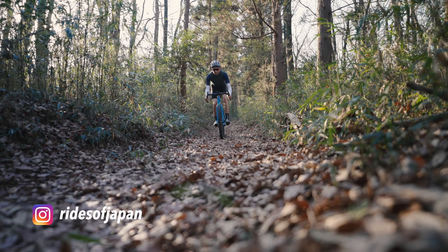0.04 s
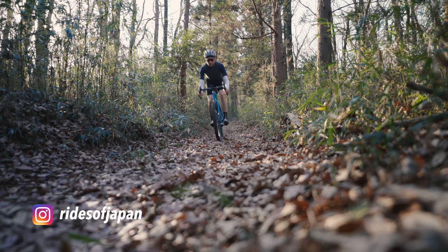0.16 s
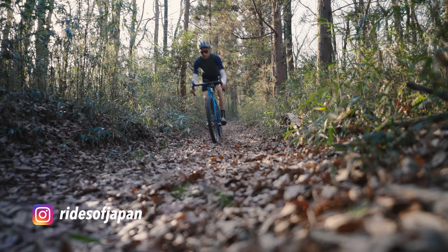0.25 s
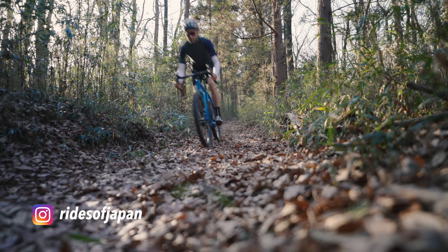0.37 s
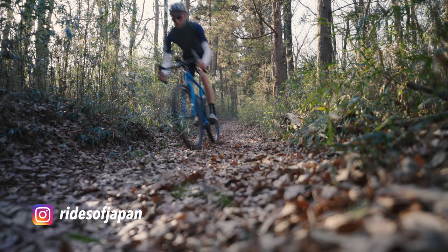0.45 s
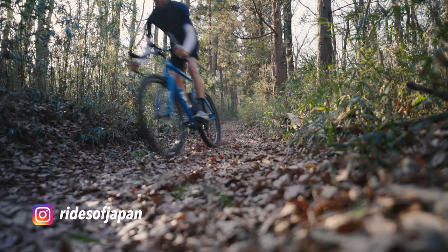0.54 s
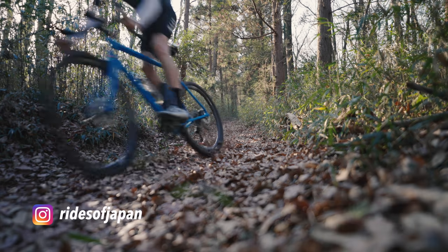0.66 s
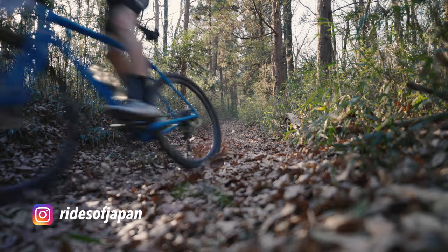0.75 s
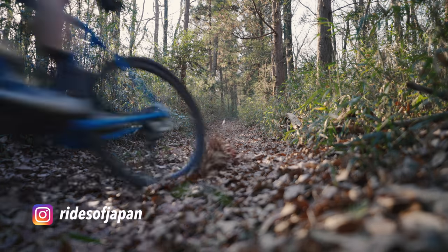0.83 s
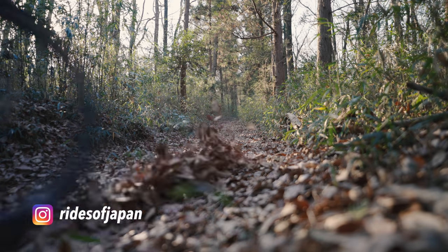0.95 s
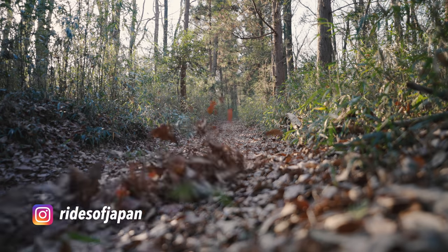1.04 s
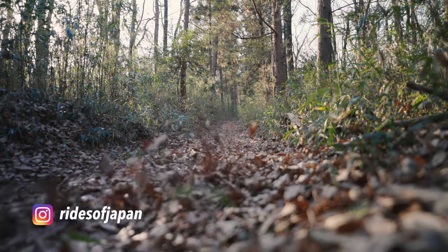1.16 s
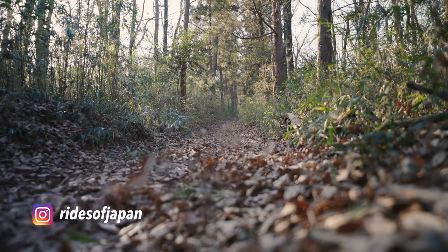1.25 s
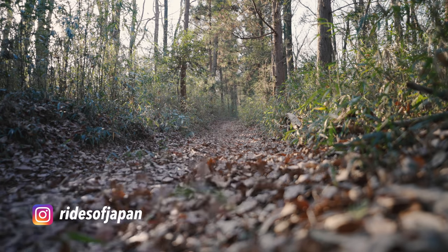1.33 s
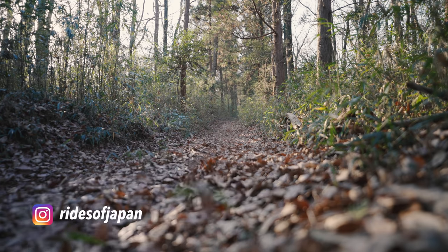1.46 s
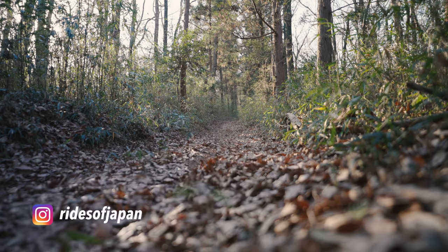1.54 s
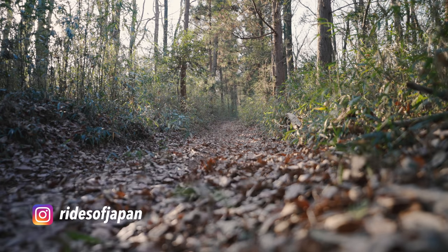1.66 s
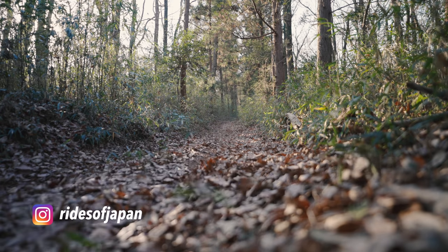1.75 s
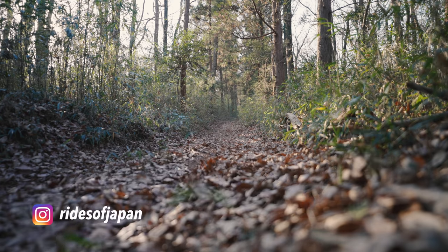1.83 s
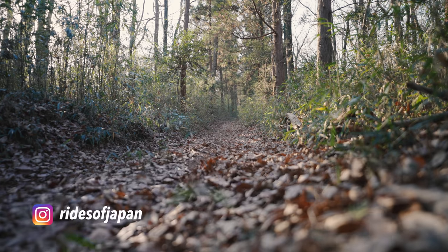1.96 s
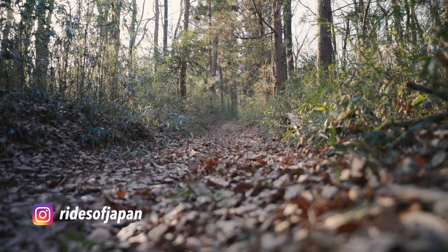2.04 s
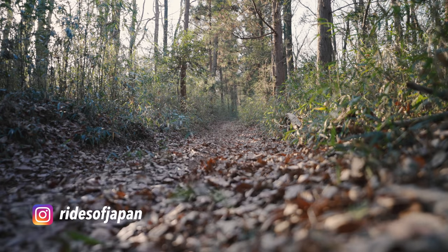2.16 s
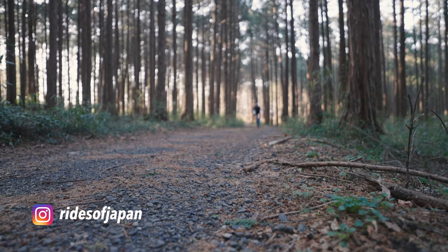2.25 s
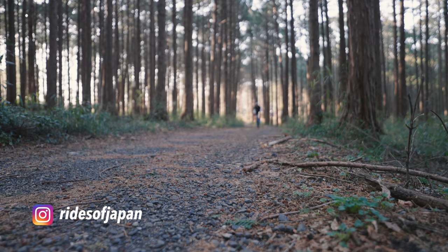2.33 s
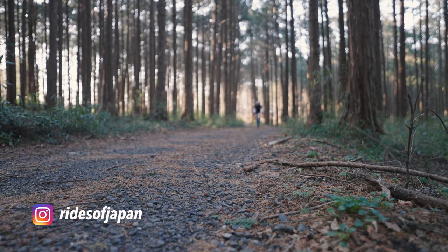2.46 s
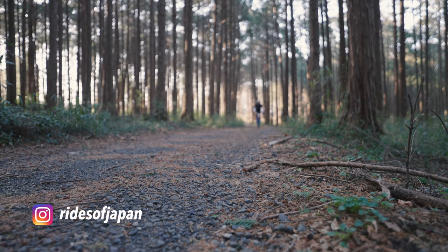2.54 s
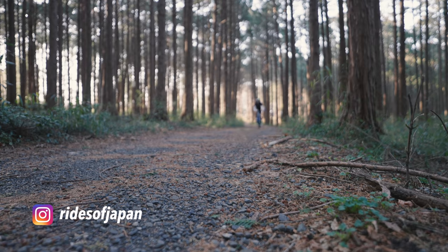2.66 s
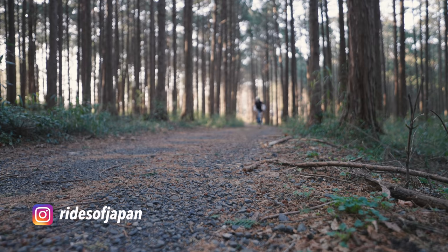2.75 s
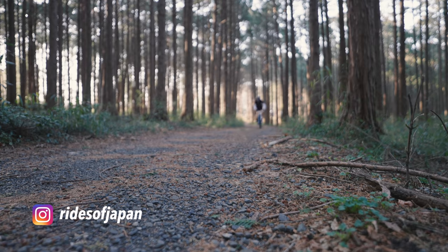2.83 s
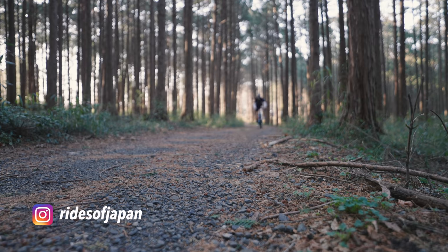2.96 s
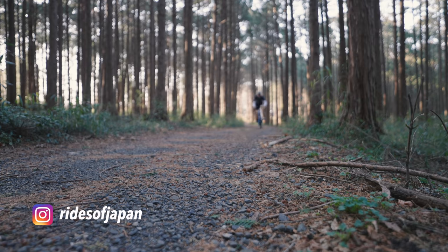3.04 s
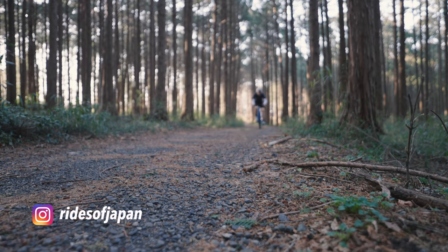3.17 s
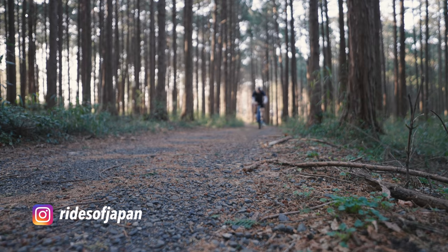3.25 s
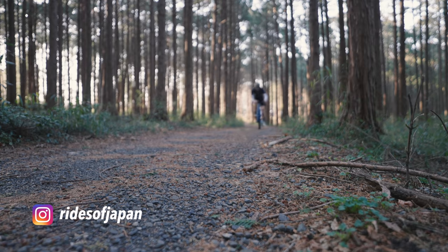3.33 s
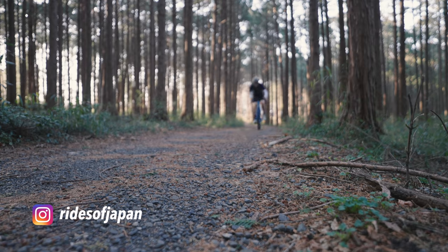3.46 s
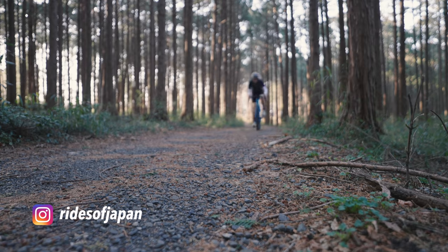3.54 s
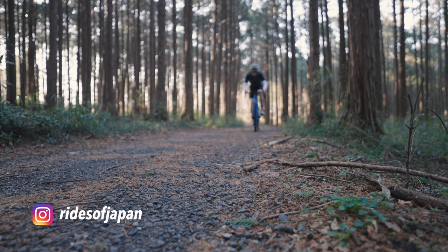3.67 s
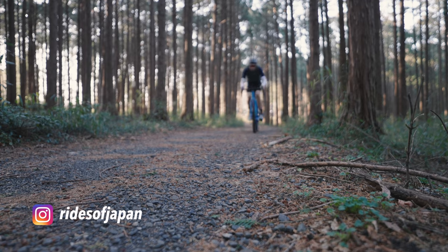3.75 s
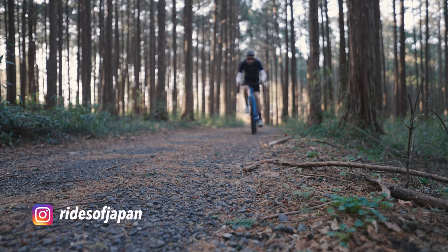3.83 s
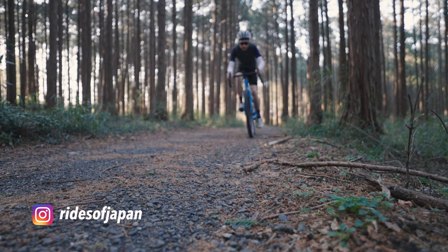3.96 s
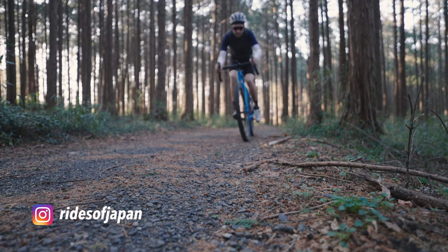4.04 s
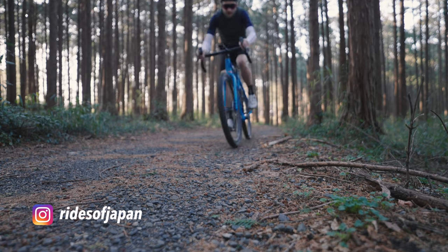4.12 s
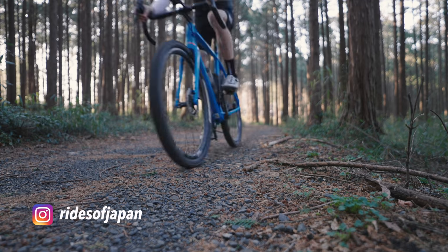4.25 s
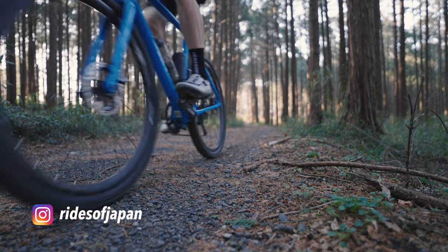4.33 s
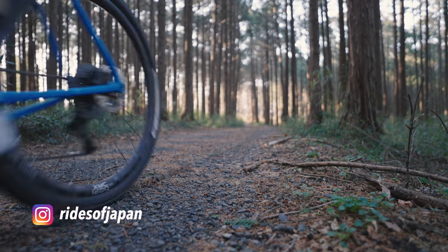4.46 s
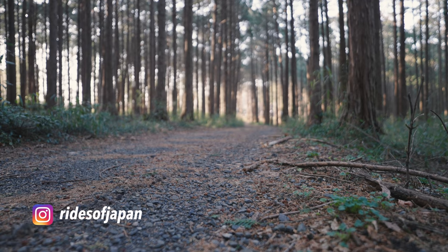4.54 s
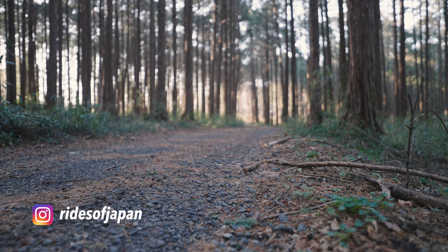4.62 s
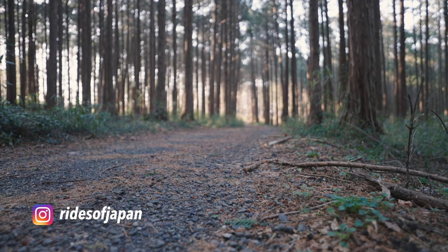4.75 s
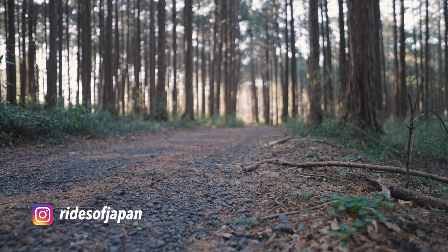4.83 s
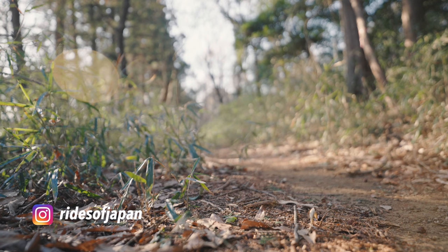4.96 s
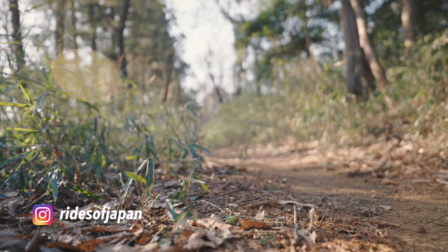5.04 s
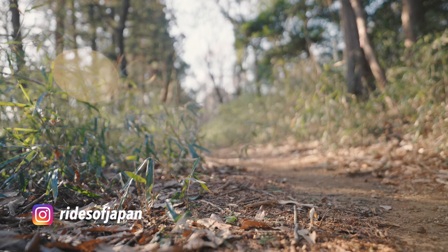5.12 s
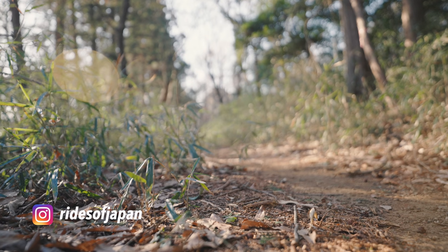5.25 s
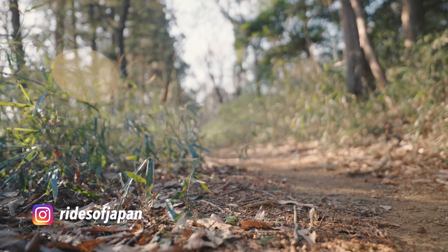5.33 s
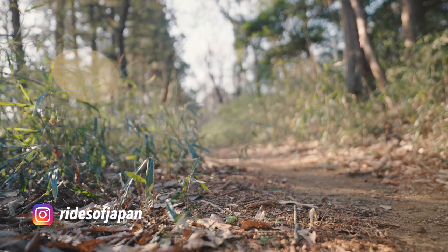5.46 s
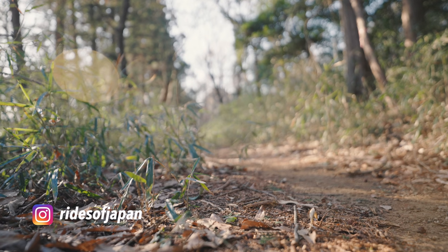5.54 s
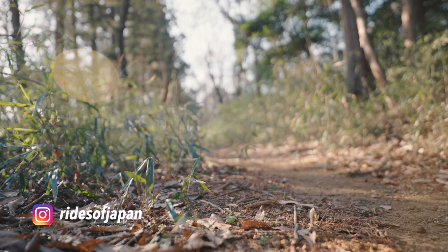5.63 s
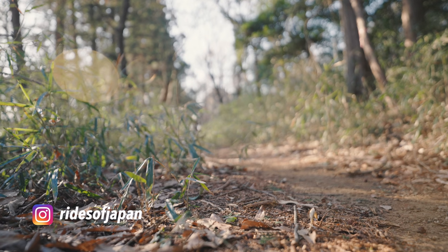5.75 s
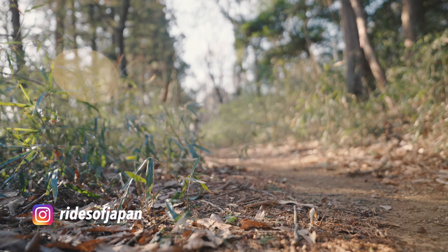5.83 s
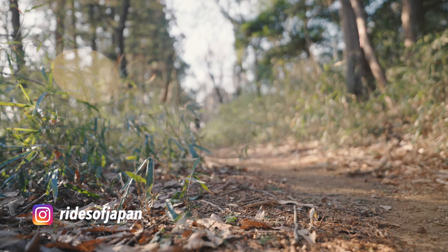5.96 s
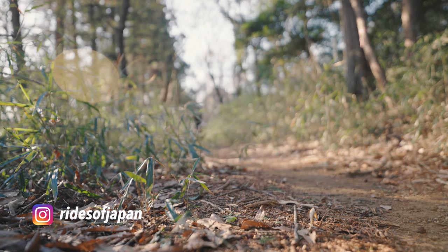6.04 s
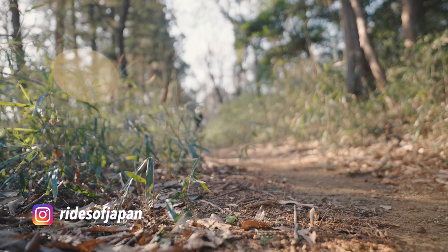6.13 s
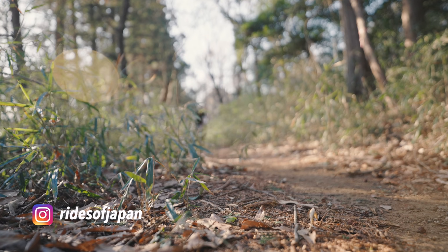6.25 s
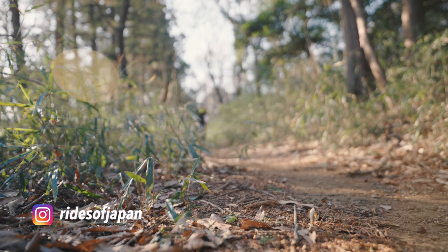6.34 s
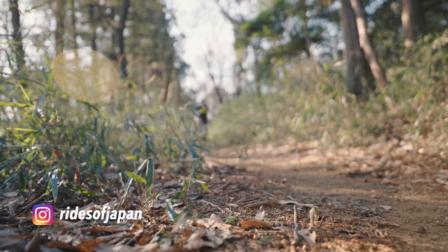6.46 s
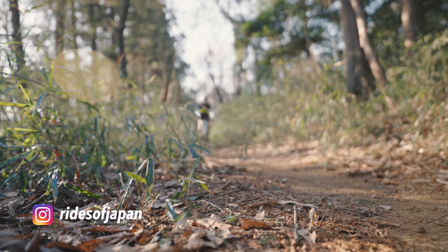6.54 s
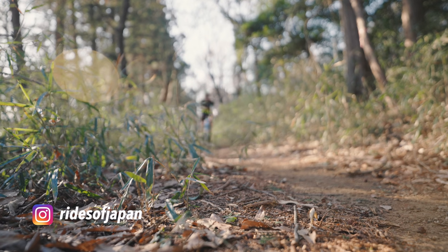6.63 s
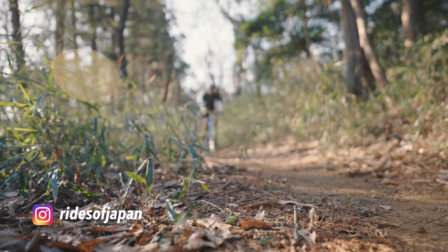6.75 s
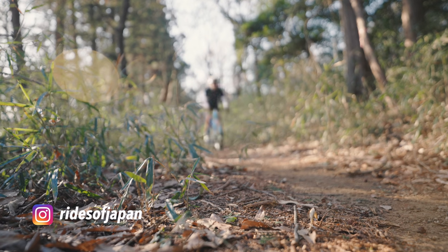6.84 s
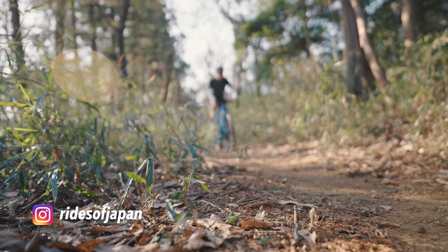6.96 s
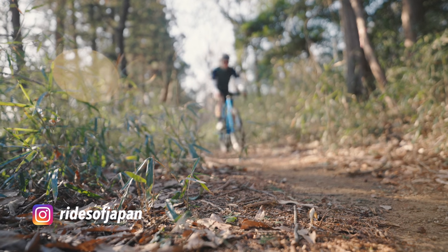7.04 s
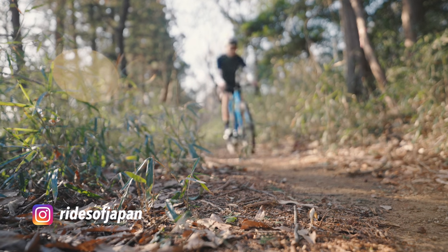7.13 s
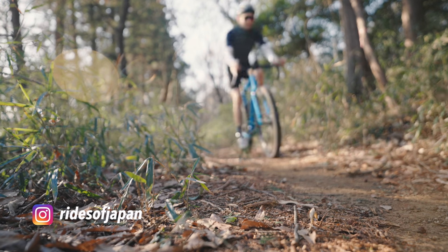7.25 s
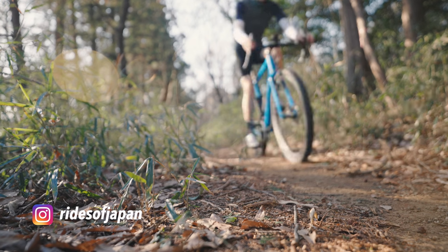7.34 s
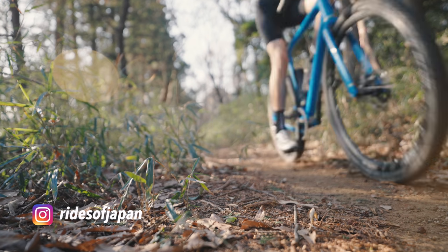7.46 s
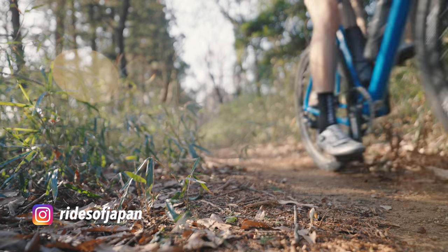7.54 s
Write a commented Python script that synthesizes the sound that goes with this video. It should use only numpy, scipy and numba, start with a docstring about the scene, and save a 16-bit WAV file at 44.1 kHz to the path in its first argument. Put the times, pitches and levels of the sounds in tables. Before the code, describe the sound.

A bicycle tyre rushes up over dry leaves, crunching loudest before one second, with a low thump of air, a brief freewheel buzz and leaves settling. A cut brings steady patchy gravel crunch that grows to sharp stone and twig snaps at about 4.5 seconds, then drops away. Last, near-quiet dirt with small ticks builds to a close crackling pass. Mono microphone on the forest floor, dry and close.

```python
"""A bicycle rolls past a microphone on the forest floor three times: over dry leaves, over gravel, over twigs
and dirt. The tyre is random grain clicks and hiss through resonances: rumbling carcass, humming air ring,
crunching stones. Twigs snap with a spike and a short ring, one with a forest echo; leaves are bright noise that
rustles, swishes, ticks. On the first pass the freewheel buzzes in even noise clicks. Stirred air buffets the
microphone with low noise; eddies and wheel thuds are pressure flips. A faint electronic whine hangs high up in
steady sines."""
import sys
import numpy as np
from scipy import signal
from scipy.io import wavfile
from scipy.ndimage import uniform_filter1d
from numba import njit

SR = 44100
rng = np.random.default_rng(int(sys.argv[2]) if len(sys.argv) > 2 else 0)


def dump_mix(stems):
    """Bounce the given channels to the path in sys.argv[1] as a 16-bit WAV at rate SR."""
    frames = np.atleast_2d(stems).T  # one column per channel
    limited = np.clip(frames, -1, 1)  # hard clip at full scale
    pcm = np.round(limited * 32767).astype(np.int16)
    wavfile.write(sys.argv[1], SR, pcm)


N = 334719

# the three grounds: [start t/s, patchiness 0-1]
GROUNDS = [(0, 0), (2.282, 0.95), (5, 0.7)]

# Resonances: [f/Hz, width/Hz of each of two filter stages, relative level/dB on each of the three grounds]
# tyre carcass
CARCASS_MODES = [(76.1, 54.3, 1, 9.5, 9.5), (102.5, 60, -5, -4, -18), (159, 145, -5, -2.5, -2)]
# air ring inside the tyre
AIR_RING_MODES = [(348, 52, -0.5, 1.5, 4), (692, 137, -6, -3, -3), (1050, 46, -7, -10.5, -14.5)]
# stones
GRAVEL_MODES = [(471, 425, 5.5, 0.016, 1.5), (756, 770, 1.5, 0, 1.4), (1128, 434, -5.5, 0.0036, -4.5),
                (1440, 550, -4.5, 0.0074, -3.5)]
# twig litter
LITTER_MODES = [(1890, 670, -6.5, 4.5, -3.5), (2650, 930, -6, 1, -6), (3480, 1900, -0.5, 0, -5.5),
                (4740, 2340, -4.5, -7.5, -9.5)]
# dry leaves
LEAF_MODES = [(6460, 7300, -1.5, -1.5, 0.17), (7500, 5400, -0.87, -2.5, -1.3),
              (11540, 7900, 0.98, -1.7, -1.3), (14400, 7800, 0.31, 0, -0.48)]
# stirred air at the microphone
BUFFET_MODES = [(34, 13, 1.2, 7, 0.54), (67, 32, 2.7, -8, 0)]

# the passes, the second with its fading apart:
# [t/s, crunch under the tread level/dB, twig litter level/dB, leaf rustle level/dB]
ROLLS = [
    [(0.0, -46.5, -49.5, -51.5), (0.21, -47.5, -47.5, -44), (0.37, -44.5, -41, -40),
     (0.45, -37, -34, -34.5), (0.65, -33, -25.5, -29), (0.77, -29.5, -30.5, -27), (0.87, -25.5, -30, -28),
     (0.92, -33, -30, -30.5), (1.0, -44, -39, -39.5), (1.08, -51, -43, -41), (1.2, -49.5, -43, -39),
     (1.32, -50.5, -40.5, -39.5), (1.44, -42, -44, -41.5), (1.61, -50, -51, -48.5), (1.87, -54.5, -50, -50),
     (2.0, -61, -60, -56.5), (2.275, -57.5, -58, -61)],
    [(2.29, -45.5, -66, -61), (2.47, -44.5, -66, -65), (2.72, -42, -58.5, -56.5), (2.84, -44.5, -63, -63.5),
     (3.3, -38.5, -58.5, -60.5), (3.38, -38, -57.5, -57.5), (3.64, -39, -55, -61), (3.96, -35, -47.5, -58),
     (4.06, -32, -44.5, -55), (4.26, -30, -39.5, -45.5), (4.37, -28.5, -33, -40.5), (4.45, -33, -40.5, -48),
     (4.52, -29.5, -36, -47)],
    [(4.54, -38.5, -45.5, -56), (4.62, -43, -54, -59), (4.68, -53, -57, -66), (4.77, -46, -61, -68),
     (4.85, -52.5, -64.5, -70), (4.995, -54.5, -67.5, -71)],
    [(5.0, -60, -65, -73), (5.12, -61, -69.5, -76), (5.22, -62.5, -60.5, -65.5), (5.6, -51, -55, -64.5),
     (5.78, -57, -60.5, -58.5), (6.05, -55.5, -58.5, -59), (6.35, -49, -50, -60), (6.65, -43.5, -47, -52),
     (6.72, -50, -54, -59.5), (6.85, -46.5, -53, -57), (7.05, -43, -47, -50.5), (7.22, -36.5, -45, -50.5),
     (7.33, -44, -42.5, -52.5), (7.4, -38, -39, -44.5), (7.51, -31.5, -35, -36.5),
     (7.59, -38.5, -33.5, -42)],
]
# shaking of the tyre carcass: [t/s, level/dB]
RUMBLE = [(0.0, -29.5), (0.06, -43), (0.65, -36.5), (0.89, -20.5), (1.2, -43), (1.65, -48.5), (1.88, -40),
          (1.92, -54), (2.07, -50), (2.26, -49), (2.3, -37.5), (2.49, -43), (3.87, -42.5), (4.4, -33.5),
          (4.69, -49), (4.99, -37.5), (5.03, -53.5), (6.47, -50.5), (7.06, -39.5), (7.31, -49.5),
          (7.46, -32), (7.59, -40)]
# air stirred at the microphone: [t/s, level/dB]
WAKE = [(0.0, -63), (0.74, -68), (0.89, -27), (1.01, -49), (1.41, -52), (1.86, -41), (2.26, -43),
        (2.33, -60), (4.25, -69), (4.37, -40), (4.46, -66.5), (5.94, -69), (7.57, -58), (7.59, -54)]
# bumps that set the air ring humming for a moment: [t/s, level/dB]
BUMPS = [(0.505, -33), (0.655, -35), (0.86, -28), (2.718, -37), (2.921, -44), (3.335, -32.5),
         (3.537, -33.5), (3.96, -53), (4.29, -26), (5.21, -47.5), (5.29, -52), (5.42, -55), (5.88, -56),
         (6.239, -50), (6.435, -50), (6.655, -49), (7.395, -42), (7.509, -40)]
# air ring above the crunch: [level/dB on each of the three grounds]
AIR_RING_DB = [-3.5, -3, -4.5]
# lone chips above the crunch: [level/dB on each of the three grounds]
CHIPS_DB = [-11, -14.5, -12.5]
# steady tones of the electronics: [f/Hz, rms level/dB]
WHINE = [(6751, -81), (7127, -80), (13501, -85), (14250, -83), (14626, -84)]

# stones and twigs under the tread: [t/s, level/dB, f/Hz, spike relative level/dB, crunch relative level/dB]
SNAPS = [(0.047, -29, 400, -4, -10), (0.162, -28, 730, -8, -8), (0.334, -28, 750, -7, -5),
         (0.504, -16.5, 342, -8, -12), (0.595, -13, 2000, -11, -12), (0.652, -11.5, 369, -7, -6.5),
         (0.722, -17, 1210, -4, 0), (0.772, -12, 676, -7, -0.5), (0.863, -18, 493, -20, -10),
         (1.352, -12.5, 1090, -16, -11), (1.389, -16, 1070, -22, -13), (1.443, -18, 800, -20, -10.5),
         (1.56, -26.5, 636, -10, -12), (2.382, -25, 690, -15, -10), (2.49, -21.5, 790, -28, -30),
         (2.598, -20.5, 780, -24, -9), (2.635, -24.5, 690, -19, -6), (2.685, -29, 370, -18, -21),
         (2.72, -26.5, 500, -14, -12), (2.787, -25, 466, -23, -30), (2.869, -26, 750, -8, -13),
         (2.937, -23.5, 735, -7, -16), (2.911, -19, 395, -24, -29), (2.993, -22, 483, -2, -12),
         (3.029, -27.5, 730, -8, -19), (3.163, -37, 705, -8, -15), (3.211, -18, 480, -17, -29),
         (3.335, -20.5, 480, 0, -8), (3.363, -20, 780, -15, -17), (3.389, -15, 720, -3, -19),
         (3.447, -23, 900, -8, -11), (3.49, -26, 1070, -15, -9), (3.539, -24, 368, -17, -19),
         (3.585, -25, 1280, -11, -8), (3.609, -33, 2000, -6, -9), (3.643, -23.5, 1060, 1, -5),
         (3.708, -22, 895, -10, -14), (3.737, -18.5, 990, -4.5, -15), (3.783, -32.5, 350, 7, 1),
         (3.81, -27, 2450, -9, -12), (3.83, -29, 2500, -5, -10), (3.877, -19, 1130, 2, -1.5),
         (3.954, -24, 708, -11, -17), (4.016, -27, 366, -2, 10), (4.033, -16.5, 696, -17, 0.5),
         (4.094, -22.5, 1300, 1, -1), (4.133, -21, 681, 4, -13), (4.155, -18, 730, -4, 1),
         (4.192, -24, 710, -2, -9), (4.22, -18, 1500, -3, -7), (4.261, -16, 680, -6, 5),
         (4.287, -15.5, 363, -6, -2), (4.307, -14, 650, -8, -12), (4.328, -19, 675, -3, 5.5),
         (4.355, -17, 1463, -6, -2), (4.384, -15, 660, 5, 8.5), (4.457, -16.5, 563, -10, -4),
         (4.481, -15.5, 560, -13, -1), (4.491, -16, 2200, -8, 0), (4.508, -11, 2340, -20, -6),
         (4.5153, -5, 2350, -0.5, -5), (4.593, -27, 2920, -15, -14), (4.706, -24, 2170, -18, -15),
         (5.543, -22, 3930, -14, -11.5), (5.599, -25, 373, 2.5, -7.5), (5.614, -28, 600, -4, -8),
         (6.071, -29, 407, -3, -14), (6.213, -27, 410, -4, -9.5), (6.349, -28, 700, 6, 0),
         (6.427, -29.5, 620, -2, -13), (6.505, -31, 1020, -10, -3), (6.53, -27, 900, -6, -7),
         (6.7, -31, 2000, -10, -14), (6.454, -29, 1200, -10, -20), (6.868, -36, 890, -5, -11),
         (6.937, -31, 890, -7, -8), (7.025, -27, 700, -4, -3.5), (7.048, -25.5, 796, -6, -4),
         (7.066, -22, 1390, -5, -17), (6.616, -38, 368, 15, 10.5), (6.65, -22, 463, -3, -10.5),
         (7.095, -26.5, 1220, 9.5, -8), (7.137, -21.5, 1500, -10, -12), (7.171, -15, 1440, -12, -14),
         (7.1974, -13, 670, 4, -9), (7.261, -30, 1300, 0, 2), (7.304, -26, 1290, -14, -15),
         (7.389, -13, 414, -8, 0), (7.4, -19, 726, 8, 2), (7.525, -9.5, 790, -3, -3)]
# time scale of a snap's crunch: [time/ms on each of the three grounds]
CRUNCH_MS = [10.3, 3.5, 10.5]
# leaves ploughed, thrown up, settling or stirred; at 5.56 s the forest echo of a snap:
# [peak t/s, f/Hz, width/Hz, level/dB, rise/(dB/s), fall/(dB/s)]
SWISHES = [(0.62, 1960, 700, -29.5, 51, 51), (0.8, 660, 350, -29, 300, 76), (0.96, 3320, 1000, -36, 66, 83),
           (1.27, 1090, 600, -44, 300, 64), (1.355, 1180, 700, -35, 250, 135),
           (1.7, 1110, 250, -55.5, 34, 30), (1.8, 490, 200, -56.5, 23, 31),
           (1.9, 3630, 2020, -60.5, 30, 1.5), (1.95, 7100, 3000, -62.5, 30, 13),
           (5.56, 3100, 1880, -48, 600, 79)]
# brittle leaves breaking: [t/s, level/dB, f/Hz]
TICKS = [(1.531, -28, 8400), (1.665, -26, 3400), (1.83, -28, 4000), (1.88, -38, 3000), (1.911, -32, 6530),
         (1.958, -42, 6400), (2.174, -47, 6400), (2.212, -35.5, 5000), (2.32, -42, 6000),
         (2.578, -30, 7710), (2.599, -22.5, 12500), (3.136, -33, 7300), (3.3317, -30, 6700),
         (3.39, -26.5, 8300), (3.53, -33, 5900), (3.687, -41, 4500), (4.0, -41, 6000), (4.016, -42, 5000),
         (4.155, -29, 12200), (4.258, -35, 5560), (4.384, -23, 8000), (4.466, -21, 14100),
         (4.481, -21, 12000), (4.4898, -17, 10000), (5.2103, -41.5, 6260), (5.35, -44, 5000),
         (5.48, -42, 5000), (5.822, -32, 6540), (5.881, -34, 11000), (6.9373, -31, 8040),
         (7.0224, -35, 6400), (7.193, -28, 5720), (7.234, -32, 6300), (7.322, -29, 13700),
         (7.386, -20, 5590), (7.525, -14, 5240)]
# low pressure jumps, eddies of the wake and from 7.45 s on thuds of the passing wheel:
# [t/s, level/dB, +1 pressure jumps up or -1 down]
PRESSURE_JUMPS = [(1.765, -34, -1), (1.823, -31, 1), (1.88, -28.5, -1), (2.01, -29, -1), (2.069, -28, -1),
                  (2.103, -31, 1), (2.13, -27, -1), (2.187, -30, 1), (2.263, -33.5, 1), (7.452, -29, -1),
                  (7.466, -35, -1), (7.506, -35, -1)]


def undb(db):
    """Gain of a level in dB."""
    return 10 ** (np.asarray(db) / 20)


def unit(x):
    """Scale to rms 1."""
    return x / np.sqrt(np.mean(x ** 2))


def add(out, s, x):
    """Mix x into out from second s on."""
    i = int(s * SR)
    out[i:i + len(x)] += x[:N - i]


def ground(values):
    """The value that holds on the ground of the moment, sample by sample."""
    starts = [start for start, _ in GROUNDS]
    return np.asarray(values)[np.searchsorted(starts, np.arange(N) / SR, "right") - 1]


def follow(table):
    """The columns of a curve, one interpolated value for each sample."""
    s, *columns = np.transpose(table)
    return [np.interp(np.arange(N) / SR, s, column) for column in columns]


def swell(s, db, rise, fall):
    """Gain that climbs to db at second s and sinks again, with slopes in dB per second."""
    t = np.arange(N) / SR
    return undb(db - np.maximum(rise * (s - t), fall * (t - s)))


@njit
def svf(x, hz, width):
    """State-variable band-pass, gain 1 at the centre; centre and width may move."""
    y, band, low = np.empty(len(x)), 0., 0.
    for i in range(len(x)):
        f = hz[i % len(hz)]
        g, k = np.tan(np.pi * f / SR), width[i % len(width)] / f
        # the tiny offset keeps the states out of denormal numbers
        v = (band + g * (x[i] + 1e-18 - low)) / (1 + g * (g + k))
        band, low, y[i] = 2 * v - band, low + 2 * g * v, k * v
    return y


def ring(x, hz, width):
    """A steep resonance: two band-pass stages, scaled to rms 1."""
    hz, width = np.atleast_1d(1. * hz, 1. * width)
    return unit(svf(svf(x, hz, width), hz, width))


def breaks(per_s, scatter_db):
    """Random clicks; positive scatter makes a few much bigger, negative a few much smaller."""
    when, size = rng.random((2, N))
    level_db = -scatter_db * np.log(np.abs(2 * size - 1) + .02)
    return (when < per_s / SR) * undb(level_db) * np.sign(size - .5)


def grains(per_s, scatter_db, hiss):
    """Breaking grains over a smoother hiss of sliding dirt."""
    return unit(breaks(per_s, scatter_db)) + hiss * rng.standard_normal(N)


def clumps(per_s, scatter_db, fade_ms, base):
    """Patches of rubble: the crunch swells fast as the tread meets one and dies away."""
    hits = uniform_filter1d(np.abs(breaks(per_s, scatter_db)), int(.004 * SR))
    fading = signal.lfilter([1], [1, -np.exp(-1000 / (fade_ms * SR))], hits)
    patches = unit(base + unit(fading))
    return patches ** ground([patchiness for _, patchiness in GROUNDS])


def crunch(modes, patches, **kind):
    """Separate grains drive each resonance, bunched by the patches."""
    return unit(sum(undb(ground(db)) * ring(grains(**kind) * patches, hz, width)
                    for hz, width, *db in modes))


def pieces(low_hz, high_hz, cycles, per_s, scatter_db):
    """Lone pebbles or flakes: each one rings briefly at a pitch of its own."""
    hits = breaks(per_s, scatter_db)
    pitches = low_hz * (high_hz / low_hz) ** rng.random(N)
    hz = pitches[np.cumsum(hits != 0)]  # a new pitch at every hit
    return ring(hits * np.sqrt(1 / hz), hz, hz / cycles)


def tyre_carcass(coarse):
    """The ground shakes the tyre carcass into a low rumble."""
    level_db, = follow(RUMBLE)
    return undb(level_db) * crunch(CARCASS_MODES, coarse ** 0.11, per_s=52.0, scatter_db=-6.0, hiss=2.7)


def air_ring(crunch_db, coarse):
    """The ring of air in the tyre hums along with the crunch and louder at bumps."""
    bumps = sum(swell(s, db, rise=900, fall=309) for s, db in BUMPS)
    hum = undb(crunch_db + ground(AIR_RING_DB)) + bumps
    return hum * crunch(AIR_RING_MODES, coarse ** 0.81, per_s=150., scatter_db=4.0, hiss=0.91)


def gravel(patches):
    """Stones grinding and lone pebbles; they are too big to ring high."""
    stones = crunch(GRAVEL_MODES, patches, per_s=200., scatter_db=0.0, hiss=0.48)
    pebbles = undb(-9) * pieces(415.0, 2144.0, cycles=4.1, per_s=70., scatter_db=1.5)
    low_pass = signal.butter(4, 1740, fs=SR, output="sos")  # cutoff in Hz
    return signal.sosfilt(low_pass, stones + pebbles)


def chips():
    """Lone stones cracking apart: dry clicks at random moments."""
    return undb(ground(CHIPS_DB)) * ring(breaks(per_s=110.0, scatter_db=2.0), 1500.0, 1500.0)


def twig_litter(coarse, fine):
    """Twig litter crackles in patches, with lone pieces ringing above it."""
    crackle = crunch(LITTER_MODES, coarse ** 0.55 * fine, per_s=400.0, scatter_db=2.0, hiss=1.26)
    lone = pieces(1934.0, 4620.0, cycles=10.0, per_s=150., scatter_db=-6.0)
    return crackle + undb(-11) * lone


def leaf_rustle(fine):
    """Leaves rustle as dense bright grains, with lone flakes ringing higher."""
    rustle = crunch(LEAF_MODES, fine, per_s=1100.0, scatter_db=5.5, hiss=1.0)
    flakes = pieces(5700.0, 16800.0, cycles=7.8, per_s=330.0, scatter_db=7.0)
    return rustle + undb(-13.0) * flakes


def wake():
    """Stirred air buffets the microphone with low, uneven noise."""
    level_db, = follow(WAKE)
    return undb(level_db) * crunch(BUFFET_MODES, 1, per_s=13.0, scatter_db=-1.0, hiss=1.0)


def whine():
    """A faint electronic whine in steady high sines."""
    t = np.arange(N) / SR
    return sum(np.sqrt(2) * undb(db) * np.sin(2 * np.pi * hz * t) for hz, db in WHINE)


def snaps():
    """Fragments start to crunch, then the piece gives way with a sharp spike and a ring of a few cycles."""
    out, t, scale_ms = np.zeros(N), np.arange(SR // 10) / SR, ground(CRUNCH_MS)
    noises = rng.standard_normal((len(SNAPS), len(t)))
    for (s, db, hz, spike_db, crunch_db), noise in zip(SNAPS, noises):
        # high-pitched pieces give way faster
        turn = (t - min(.001, 0.736 / hz)) / min(0.00016, 0.16 / hz)
        spike = (turn ** 2 - 1) * np.exp(-turn ** 2 / 2)
        crack = np.sin(2 * np.pi * hz * t) * 2.0 * hz * t * np.exp(-t * hz / 0.72)
        age = 1000 * t / scale_ms[int(s * SR)]
        bits = ring(noise, np.sqrt(1600 * hz), 2120.0) * 2.0 * age * np.exp(-2 * age)
        add(out, s - .002, undb(db + crunch_db) * bits)
        add(out, s + 0.0003, undb(db) * (undb(spike_db) * spike + crack))
    return out


def freewheel():
    """Even noise clicks of the pawls, faint from afar; near by, they sink in pitch as the hub goes past."""
    near_s, clicks_per_s = 1.0345, 95.0
    t = np.arange(N) / SR - near_s
    clicks = np.exp(-(t * clicks_per_s % 1) / 0.15) * rng.standard_normal(N)
    far = swell(0.16, -49, rise=22, fall=22) * ring(clicks, 2650, 600.0)
    near_hz = np.clip(2930 - 2100 * t, 2200., 3500.)
    near = swell(near_s, -35, rise=72, fall=176) * ring(clicks, near_hz, 1300)
    return far + near


def swishes(patches):
    """Swishes of leaves and one echo tail, each swelling to its peak and dying away."""
    noise = grains(per_s=1500., scatter_db=2.5, hiss=1.2) * patches
    return sum(swell(s, db, rise, fall) * ring(noise, hz, width)
               for s, hz, width, db, rise, fall in SWISHES)


def ticks():
    """Brittle leaves break in bright, very short bursts with a faint rattle after."""
    out, t = np.zeros(N), np.arange(SR // 20) / SR
    fade = np.exp(-t / 0.00026) + 0.23 * np.exp(-t / 0.0046)  # burst, rattle
    noises = rng.standard_normal((len(TICKS), len(t)))
    for (s, db, hz), noise in zip(TICKS, noises):
        add(out, s, undb(db) * ring(noise, min(hz, .35 * SR), 1.9 * hz) * fade)
    return out


def pressure_jumps():
    """Eddies or wheel thuds: pressure builds slowly, flips over quickly and relaxes."""
    edge_ms, spread_ms = 2.9, 8.5
    out, ms = np.zeros(N), 1000 * np.arange(SR // 10) / SR - 50
    flip = 2 * np.tanh(ms / edge_ms) * np.exp(-(ms / spread_ms) ** 2)
    for s, db, way in PRESSURE_JUMPS:
        add(out, s - .05, undb(db) * np.sign(way) * flip)  # the flip falls at second s
    return out


def scene():
    """Mix the rolling tyre, the litter it breaks, the freewheel, the air and the thuds at the microphone."""
    crunch_db, litter_db, leaves_db = follow(np.concatenate(ROLLS))
    coarse = clumps(per_s=120.0, scatter_db=1.0, fade_ms=10.0, base=0.41)
    fine = clumps(per_s=60., scatter_db=3., fade_ms=8., base=1.5)
    out = tyre_carcass(coarse) + air_ring(crunch_db, coarse)
    out += undb(crunch_db) * (gravel(coarse) + chips())
    out += undb(litter_db) * twig_litter(coarse, fine)
    out += undb(leaves_db) * leaf_rustle(fine)
    out += wake() + whine()
    out += snaps() + freewheel() + swishes(fine) + ticks() + pressure_jumps()
    return out[None]  # one channel


def record(dry):
    """The recorder cuts the top with a steep low-pass at 15850 Hz."""
    return signal.sosfilt(signal.ellip(10, .2, 60, 15850, fs=SR, output="sos"), dry)


dry = scene()
out = record(dry)
dump_mix(out)
```